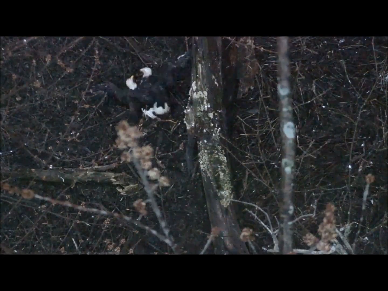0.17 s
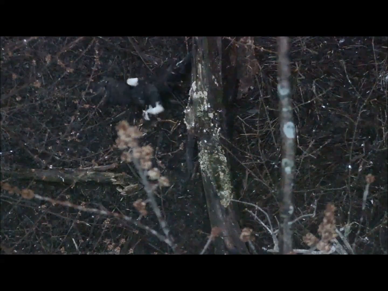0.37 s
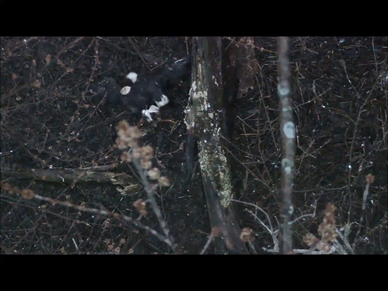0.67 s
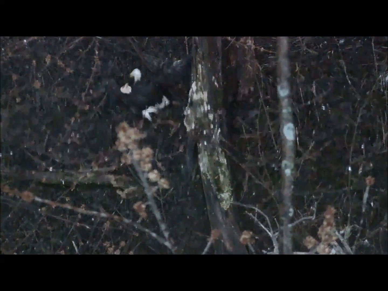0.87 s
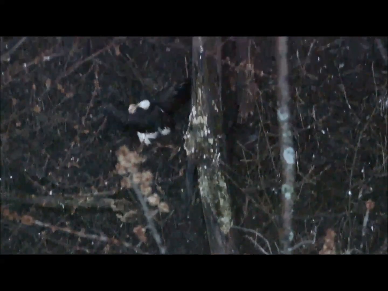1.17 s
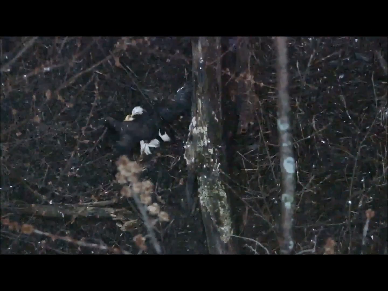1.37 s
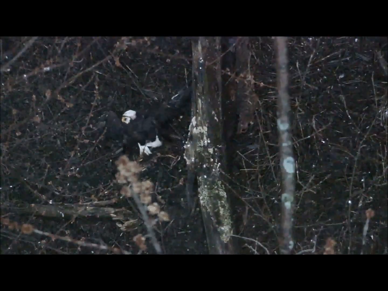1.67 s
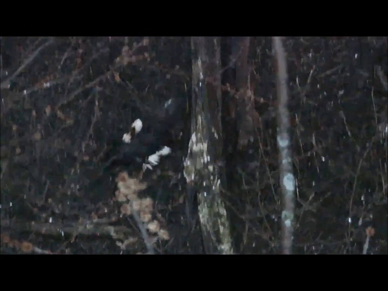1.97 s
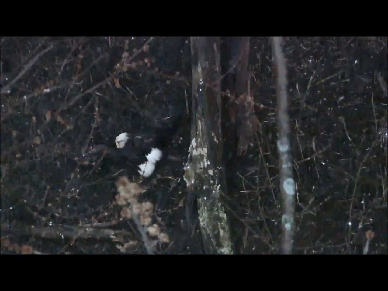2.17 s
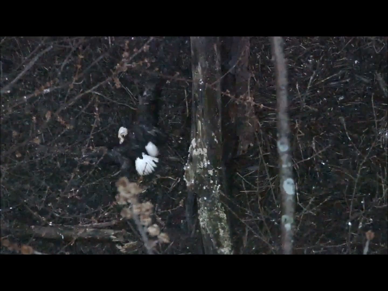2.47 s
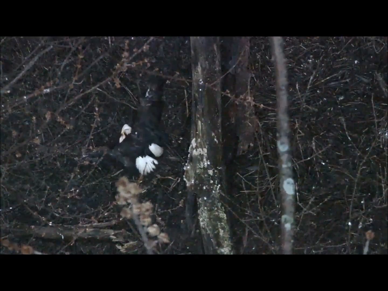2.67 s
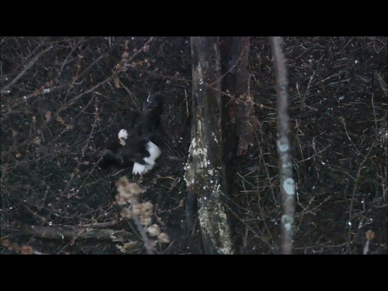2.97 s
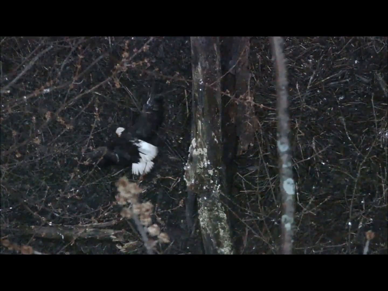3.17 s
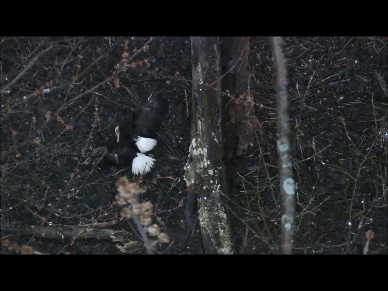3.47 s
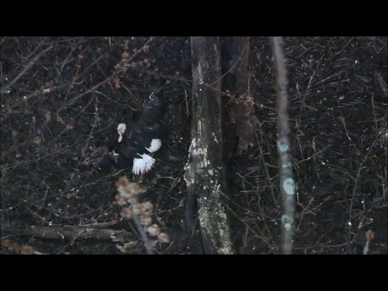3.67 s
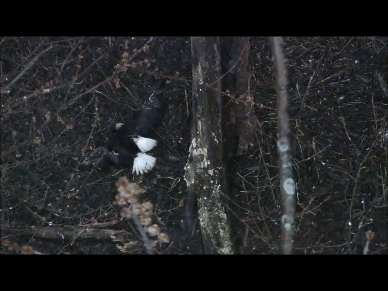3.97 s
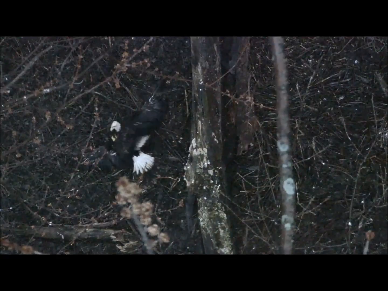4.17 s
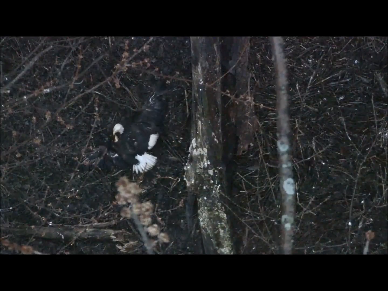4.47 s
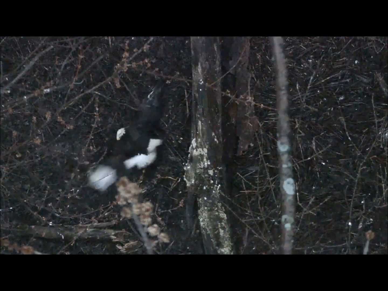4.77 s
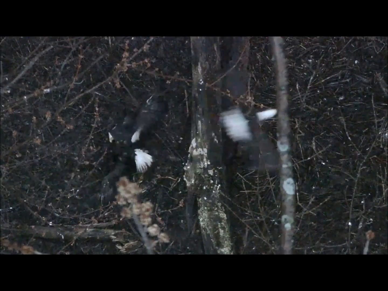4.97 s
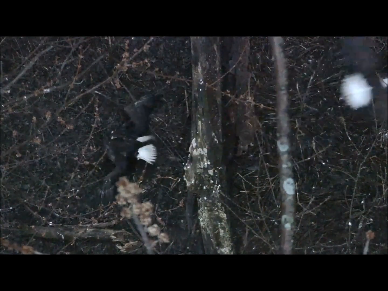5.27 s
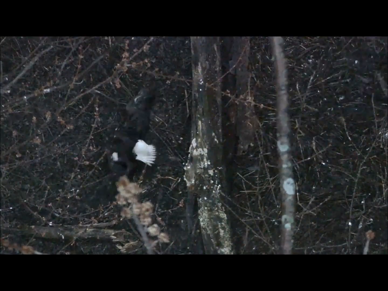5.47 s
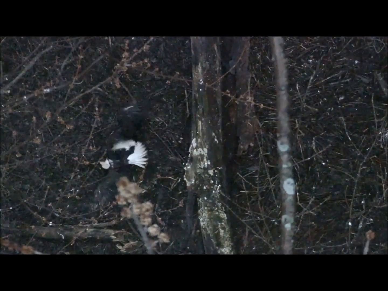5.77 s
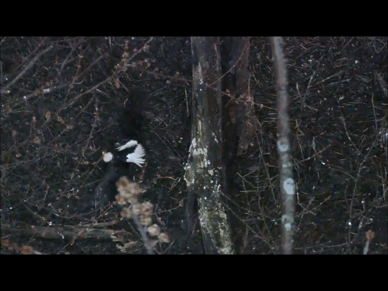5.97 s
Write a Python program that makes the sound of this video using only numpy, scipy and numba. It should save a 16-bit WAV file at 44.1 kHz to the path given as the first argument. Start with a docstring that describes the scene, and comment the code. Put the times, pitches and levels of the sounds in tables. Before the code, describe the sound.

Two large birds scuffle in dry brush, twigs snapping and wings dragging, with thin shrill throbbing whistles over a steady outdoor wind hiss.

```python
"""Throbbing whistles and short peeps ring among trees while large birds scuffle in dry brush, under a steady wind hiss.
The cries are near-sines with breath noise; snapped twigs are noise bursts through resonances; dragged wings
and litter are filtered noise and grains. Scattered echoes follow the calls and snaps.
A distant camera samples the sound at 8 kHz and joins the samples by straight lines, which mirrors every
pitch upward."""
import sys
import numpy as np
from scipy import signal
from scipy.fft import rfft, irfft
from scipy.io import wavfile
from scipy.ndimage import uniform_filter1d
from numba import njit

SR = 44100
rng = np.random.default_rng(int(sys.argv[2]) if len(sys.argv) > 2 else 0)


def master(y):
    """Save y as 16-bit WAV."""
    cut = np.clip(np.atleast_2d(y).T, -1, 1)
    pcm = np.round(cut * 32767)  # scale
    wavfile.write(sys.argv[1], SR, pcm.astype(np.int16))


N = 269432


def undb(db):
    """Decibel law: amplitude ratio of a level."""
    return 10 ** (np.asarray(db) / 20)


def unit(x):
    """Power normalisation: scale to rms 1."""
    return x / np.sqrt(np.mean(x ** 2))


@njit
def svf(x, hz, width):
    """Second-order resonance: state-variable band-pass with gain 1 at the centre."""
    y, band, low = np.empty(len(x)), 0., 0.
    g, damping = np.tan(np.pi * hz / SR), width / hz
    for i in range(len(x)):
        v = (band + g * (x[i] - low)) / (1 + g * (g + damping))
        band = 2 * v - band
        low += 2 * g * v
        y[i] = damping * v
    return y


def walk(rate):
    """Low-passed random modulation: levels held 1 / rate s and slewed twice, rms 1."""
    hold = int(SR / rate)
    steps = np.repeat(rng.standard_normal(N // hold + 1), hold)
    slewed = uniform_filter1d(uniform_filter1d(steps, hold), hold)
    return unit(slewed[:N])


def add(out, s, x):
    """Superposition: mix x into out from time s."""
    i = int(s * SR)
    out[i:i + len(x)] += x[:N - i]


def cries(phrases, octave_db, breath_db):
    """Near-sinusoidal source: a whistle with a weak octave, quick flutter and breath noise shaped by the throat."""
    # breath resonances of the throat: centre_hz, width_hz, level_db
    throat = [(2288, 67, -0.5), (900, 1300, -4)]
    out, t = np.zeros(N), np.arange(N) / SR
    flutter_db = 0.82 * walk(150)
    breath = 0
    for hz, width, db in throat:
        breath = breath + undb(db) * unit(svf(rng.standard_normal(N), 1. * hz, 1. * width))
    for phrase in phrases:
        s, hz, db = np.transpose(phrase)
        i = np.arange(int(s[0] * SR), int(s[-1] * SR))
        phase = 2 * np.pi * np.cumsum(np.interp(t[i], s, hz)) / SR
        tone = np.sqrt(2) * (np.sin(phase) + undb(octave_db) * np.sin(2 * phase))
        edge = np.minimum(np.minimum(i - i[0], i[-1] - i) / (0.00082 * SR), 1)
        level = undb(np.interp(t[i], s, db) + flutter_db[i])
        out[i] += edge * level * (tone + undb(breath_db) * breath[i])
    return out


def chirp(s, hz, db):
    """Piecewise envelope: attack, fading hold that creeps up in pitch, release that drops."""
    attack_s, hold_s, release_s = 0.0039, .026, .028
    times = s + np.cumsum([0, attack_s, hold_s, release_s])
    pitch = hz * np.array([1, 1, 1 + 0.02, 1 - 0.18])
    level_db = db + np.array([-18, 0, -8.5, -25.5])
    return np.transpose([times, pitch, level_db])


def peeps():
    """Frequency glide: each peep is a sagging sine that swells fast and fades more slowly."""
    # short peeps: start_s, length_ms, peak_db, pitch_hz
    # (the full swell lasts 1.82 lengths and begins a fifth of a length before start_s)
    peep_table = [(0.265, 17.5, -42.5, 3250), (0.53, 6, -39.5, 2370), (0.532, 5.7, -35, 1645),
                  (0.532, 6, -37.5, 3340), (0.581, 5, -42.5, 3140), (0.788, 7.2, -43.5, 3180),
                  (0.789, 7.5, -43, 1580), (0.816, 12.4, -42, 3435), (0.845, 8, -43, 2340),
                  (1.73, 7.6, -35, 3360), (1.748, 16, -42, 1885), (2.449, 9, -40, 1580),
                  (2.51, 6.6, -40, 2106), (2.526, 6.7, -36, 2110), (2.87, 13.8, -25.5, 2415),
                  (2.895, 10, -38.5, 1960), (2.922, 6.7, -37, 3210), (2.946, 13, -35, 3250),
                  (2.965, 9.9, -33, 1965), (3.635, 7.5, -43, 1726), (3.681, 8, -46, 2463),
                  (3.733, 6.6, -41, 2450), (3.783, 3.3, -34, 2660), (3.783, 4.8, -39.5, 1975),
                  (4.11, 13, -40, 1750), (4.112, 6.6, -42, 3380), (4.133, 12, -43.5, 1870),
                  (4.226, 7, -29.5, 2936), (4.374, 6.4, -34, 3060), (4.38, 5.5, -36, 2250),
                  (4.489, 8.5, -42, 3380), (5.171, 5.6, -41, 2550), (5.858, 4.9, -42.5, 3240)]
    sag = 0.019  # the pitch glides from 1.3 sags above pitch_hz to 1.7 below
    out = np.zeros(N)
    for s, ms, db, hz in peep_table:
        u = np.linspace(0, 1, int(1.82 * ms * SR / 1000))
        swell = np.sin(np.pi * u ** 0.61) ** 1.1
        phase = 2 * np.pi * np.cumsum(hz * (1 - sag * (3 * u - 1.3))) / SR
        add(out, s - ms / 5000, undb(db) * swell * np.sin(phase))
    return out


def snaps():
    """Impulse excitation: a sharp break and its splinters drive a broad crack resonance and a dull thud."""
    # twigs that snap or knock: start_s, crack_peak_db, crack_hz, thud_minus_crack_db, splinter_t60_ms
    snap_table = [(0.849, -32.5, 2510, -16, 22), (1.3637, -34, 1832, 13, 30), (1.3939, -37, 2370, -5, 17),
                  (1.8677, -28, 2170, -18, 12), (1.8834, -34, 2720, -11, 21),
                  (1.984, -29.5, 1940, -8.5, 61), (2.061, -30, 2210, -12, 15), (2.0742, -30, 2680, -19, 21),
                  (2.2194, -29.5, 2550, -19, 23), (2.2882, -29, 2080, -20, 25), (2.4988, -28, 2130, -3, 24),
                  (2.684, -30.5, 2090, -27, 17), (2.822, -22.5, 2120, -22.5, 14),
                  (4.3236, -36, 2640, -7, 20), (4.4877, -29, 2570, -8, 20), (4.5183, -20.5, 2700, -23, 14),
                  (4.9095, -35.5, 1560, -1, 18), (5.0978, -25.5, 2710, -30, 18),
                  (5.1682, -30, 1980, -9, 16), (5.4021, -30.5, 2780, -25, 16), (5.887, -34, 1500, 6.5, 15),
                  (5.9372, -35, 1980, 0, 15), (5.9624, -22.5, 1680, -29, 23)]
    out, t = np.zeros(N), np.arange(int(.06 * SR)) / SR
    splinters = rng.standard_normal((len(snap_table), len(t)))
    for (s, db, hz, thud_db, ms), noise in zip(snap_table, splinters):
        burst = (noise + 7.2 * (t == 0)) * undb(-60 * t * 1000 / max(ms, 4))
        crack = svf(burst, 1. * hz, 990.0)
        thud = svf(svf(burst, 1100.0, 1300.0), 1100.0, 1300.0)
        crack, thud = crack / np.abs(crack).max(), thud / np.abs(thud).max()
        add(out, s, undb(db) * (crack + undb(thud_db) * thud))
    return out


def wood(x):
    """Diffuse reverberation: near trunks answer first and die fast, far ones linger; moving branches waver."""
    late_t60_s, early_t60_s, early_db = 1.3, .15, 3
    t = np.arange(int(1.5 * SR)) / SR
    fade = undb(-60 * t / late_t60_s) + undb(early_db - 60 * t / early_t60_s)
    tail = rng.standard_normal(len(t)) * np.minimum(t / 0.011, 1) * fade
    return signal.fftconvolve(x * walk(110), tail / np.sqrt(np.sum(tail ** 2)))[:N]


def lunges(t):
    """Power summation: the litter level of lunges that each swell to a peak and die away."""
    # lunges through the litter: peak_s, crackle_db, length_s
    lunge_table = [(0.016, -45, 0.27), (0.592, -50.5, .25), (0.863, -46, .12), (1.15, -44, 0.16),
                   (1.327, -44, .12), (1.405, -39, 0.14), (1.719, -41.5, 0.18), (1.86, -47, 0.17),
                   (1.982, -41.5, .1), (2.064, -43.5, 0.11), (2.302, -39.5, 0.094), (2.517, -41, 0.17),
                   (2.675, -48.5, 0.072), (2.824, -41.5, 0.2), (2.87, -39, 0.16), (3.048, -40, 0.35),
                   (3.419, -43.5, 0.11), (3.792, -42.5, 0.17), (4.121, -47, 0.13), (4.2, -50, 0.31),
                   (4.321, -42.5, 0.13), (4.528, -42.5, 0.15), (5.088, -47, 0.21), (5.933, -49, 0.22)]
    rise_share, range_db, rest_db = 0.42, 31, -61  # share of length_s spent rising; swell; stirring between
    power = undb(rest_db) ** 2 + 0 * t
    for s, db, length in lunge_table:
        i = slice(max(int((s - length) * SR), 0), int((s + length) * SR))
        away = np.maximum((s - t[i]) / rise_share, (t[i] - s) / (1 - rise_share)) / length
        power[i] += undb(db - range_db * away) ** 2
    return np.sqrt(power)


def scuffle():
    """Granular noise: dense leaf and twig grains of uneven size, with a low swish of feathers."""
    # feathers dragging: time_s, level_db
    swish = [(0, -45.5), (0.41, -51.5), (0.61, -49), (0.78, -52.5), (0.9, -46.5), (1.07, -50.5),
             (1.19, -44), (1.33, -50), (1.36, -39), (1.48, -49), (2.54, -45.5), (2.65, -50.5), (2.86, -47),
             (3.33, -45.5), (3.6, -51.5), (3.79, -47.5), (3.9, -51.5), (4.34, -48), (4.66, -49.5),
             (5.03, -48.5), (5.09, -43), (5.24, -51), (5.78, -48.5), (5.94, -41), (6.01, -49), (6.11, -44)]
    t = np.arange(N) / SR
    litter = 0
    for hz, width in ((2100., 1370.0), (2850., 830.0)):
        struck = rng.random(N) < 1200 / SR  # 1200 grains a second on average
        grains = struck * rng.standard_normal(N) * undb(2.5 * rng.exponential(size=N))
        litter = litter + unit(svf(svf(grains, hz, width), hz, 1.15 * width))
    feathers = undb(1.2 * walk(40)) * svf(rng.standard_normal(N), 550., 1100.)
    swish_level = undb(np.interp(t, *np.transpose(swish)))
    return lunges(t) * unit(litter) + swish_level * unit(feathers)


def wind():
    """Spectrally shaped noise: far wind in the tree tops, bass and treble swelling slowly on their own."""
    # wind spectrum before overall scaling: frequency_hz, relative_density_db (per Hz)
    wind_table = [(15, -47), (25, -16), (44, -21.5), (184, -0.5), (444, 0.5), (970, -1), (1380, -4),
                  (1590, -5), (2600, -10.5), (3400, -26), (4420, -54), (7480, -120)]
    hz, db = np.transpose(wind_table)
    f = np.maximum(np.arange(N // 2 + 1) * SR / N, 1)
    colour = undb(np.interp(np.log(f), np.log(hz), db))
    low = 1 / (1 + (f / 900) ** 2)  # bass share of the power
    bass = irfft(rfft(rng.standard_normal(N)) * colour * np.sqrt(low), N)
    treble = irfft(rfft(rng.standard_normal(N)) * colour * np.sqrt(1 - low), N)
    return undb(-50) * unit(bass * undb(0.33 * walk(4.3)) + treble * undb(0.88 * walk(3.3)))


def scene():
    """Superposition of direct calls and snaps, their echoes, the scuffle and the wind."""
    # throbbing whistles, one list a cry, the last aimed at the camera: time_s, pitch_hz, level_db
    cry_table = [
        [(0.0, 3422, -45.5), (0.034, 3435, -42.5), (0.06, 3177, -33), (0.08, 3400, -57)],
        [(1.04, 3080, -65), (1.056, 3140, -36), (1.068, 3140, -50)],
        [(1.068, 3040, -49), (1.082, 3152, -30), (1.097, 3145, -36.5), (1.118, 3180, -28.5), (1.13, 3200, -32),
         (1.14, 3207, -28.5), (1.151, 3210, -33.5), (1.163, 3235, -27.5), (1.179, 3234, -32), (1.19, 3244, -30),
         (1.214, 3280, -33.5), (1.228, 3260, -46)],
        [(1.228, 3294, -45), (1.244, 3320, -31), (1.256, 3328, -39), (1.272, 3359, -29), (1.284, 3343, -40.5),
         (1.3, 3342, -33), (1.312, 3350, -36), (1.335, 3358, -36.5), (1.392, 3368, -43), (1.404, 3350, -34),
         (1.413, 3280, -36.5), (1.422, 3185, -30.5), (1.438, 3360, -50)],
        [(4.125, 3420, -61), (4.289, 3390, -55), (4.31, 3300, -68)],
        [(5.39, 3000, -56), (5.416, 2796, -51), (5.44, 2770, -59)],
        [(5.56, 3030, -57), (5.592, 2800, -57), (5.62, 2770, -64)],
        [(2.965, 3210, -43.5), (2.985, 3207, -29), (3.003, 3230, -25.5), (3.013, 3273, -17.5),
         (3.033, 3261, -26), (3.051, 3290, -14), (3.066, 3346, -16), (3.076, 3332, -17), (3.115, 3373, -16.5),
         (3.131, 3395, -17), (3.158, 3414, -14.5), (3.172, 3408, -16.5), (3.185, 3416, -13.5), (3.2, 3410, -15),
         (3.238, 3404, -14), (3.259, 3306, -16), (3.267, 3210, -27.5), (3.28, 3280, -48)],
    ]
    # low chirps: start_s, pitch_hz, level_db
    chirp_table = [(1.691, 1833, -25.5), (5.82, 1744, -31.5)]
    near = cries(cry_table[-1:], octave_db=-66, breath_db=-29.0)
    clear_cries, faint_cries = [], []
    for cry in cry_table[:-1]:
        is_faint = max(level_db for _, _, level_db in cry) < -45
        (faint_cries if is_faint else clear_cries).append(cry)
    far = cries(clear_cries, octave_db=-68, breath_db=-17)
    # leaves in the way make the faint cries flicker
    faint = undb(4.2 * walk(120)) * cries(faint_cries, octave_db=-60, breath_db=-16)
    low = cries([chirp(*row) for row in chirp_table], octave_db=-16, breath_db=-36)
    short = undb(1.7 * walk(200)) * peeps() + snaps()
    # the cry aimed at the camera stands far above its echo; the other cries face the trees
    to_trees = undb(-29.5) * near + undb(-14) * (far + faint) + undb(-9.5) * short + undb(-18) * low
    return (near + far + faint + low + short + wood(to_trees) + scuffle() + wind())[None]


def record(dry):
    """Sampling and imaging: 8 kHz samples joined by lines leave mirrored pitches, then smoothing and a top cut."""
    camera_hz, line_hz = 8000, SR // 2
    guard_hz, smooth_hz, top_hz = 3480, 10640, 11547
    x = dry[0] + 0.69 * svf(dry[0], 3280.0, 1690.0)  # presence lift
    # a lopsided microphone stage: loud cries leave a rumble of their own envelope
    rumble_cut = signal.butter(1, 20, "high", fs=SR, output="sos")
    x = x + signal.sosfilt(rumble_cut, 0.044 * x ** 2)
    x = signal.sosfilt(signal.ellip(10, .3, 33, guard_hz, fs=SR, output="sos"), x)
    samples = signal.resample_poly(x, 80, 441)
    # the lines are drawn at half the final rate
    joined = np.interp(np.arange(N // 2 + 1) / line_hz, np.arange(len(samples)) / camera_hz, samples)
    smoothing = signal.firwin(79, smooth_hz, window=("kaiser", 5), fs=SR)
    y = signal.resample_poly(joined, 2, 1, window=smoothing)
    return signal.sosfilt(signal.ellip(10, .2, 60, top_hz, fs=SR, output="sos"), y[:N])[None]


dry = scene()
out = record(dry)
master(out)
```